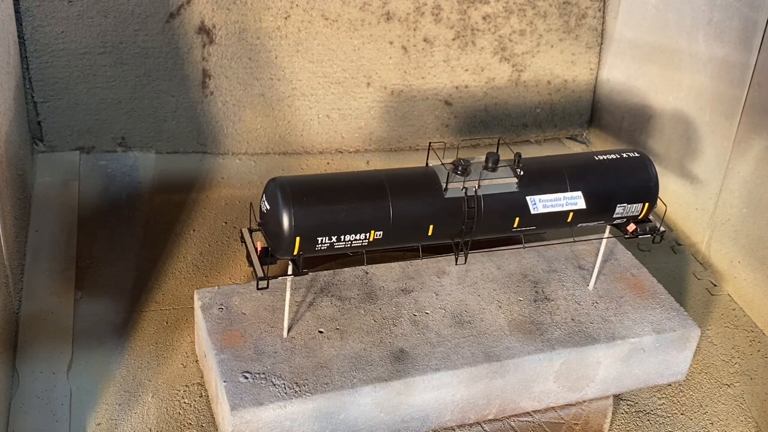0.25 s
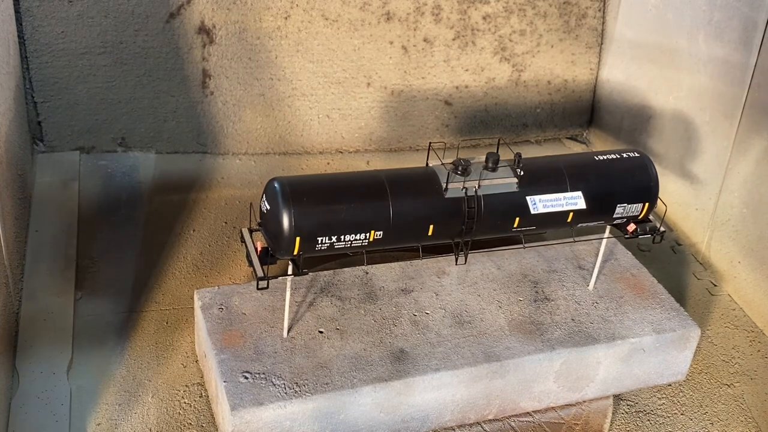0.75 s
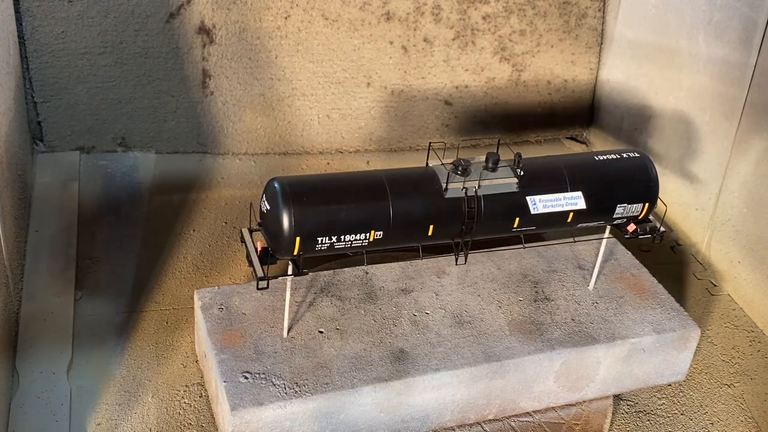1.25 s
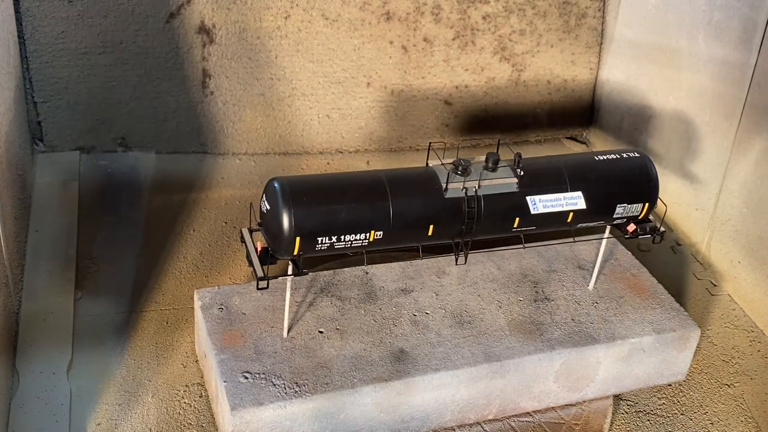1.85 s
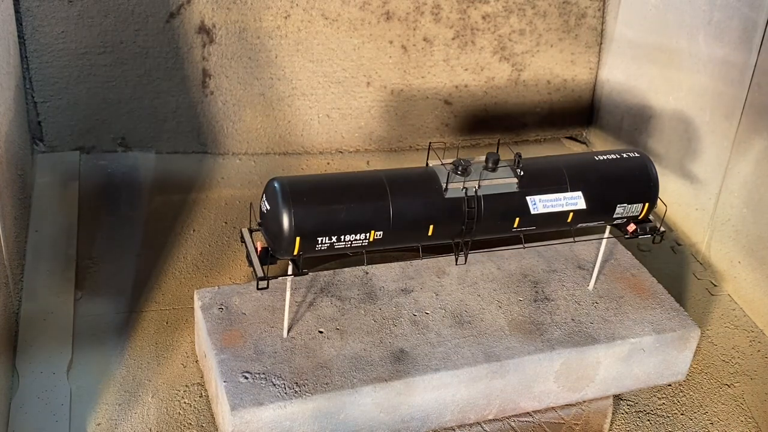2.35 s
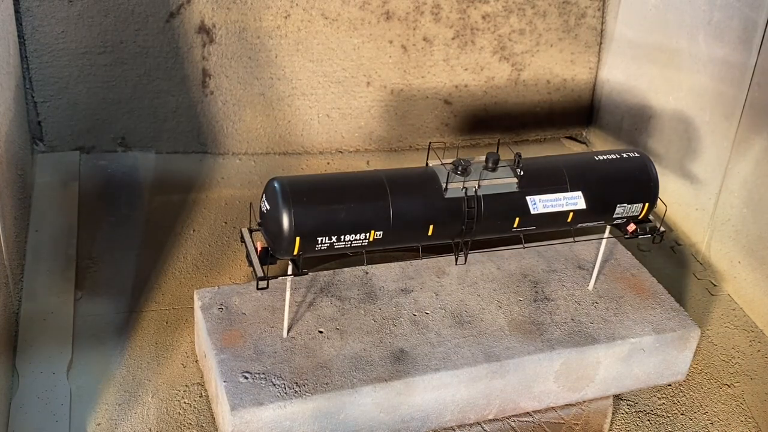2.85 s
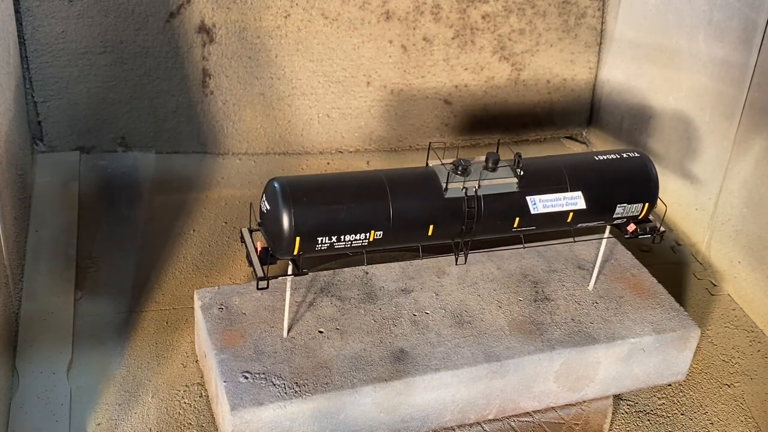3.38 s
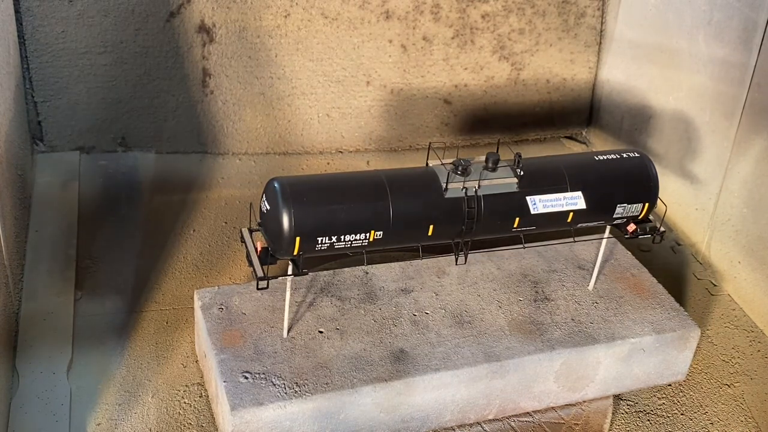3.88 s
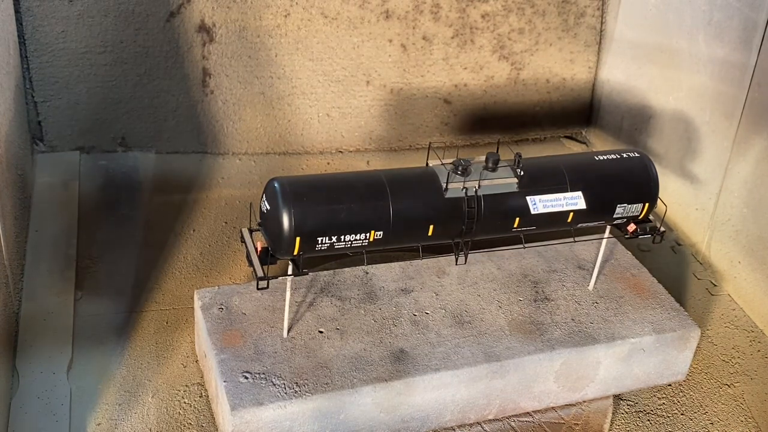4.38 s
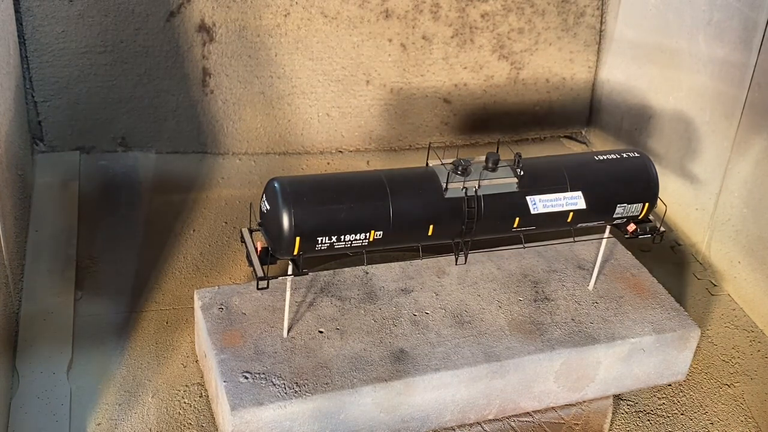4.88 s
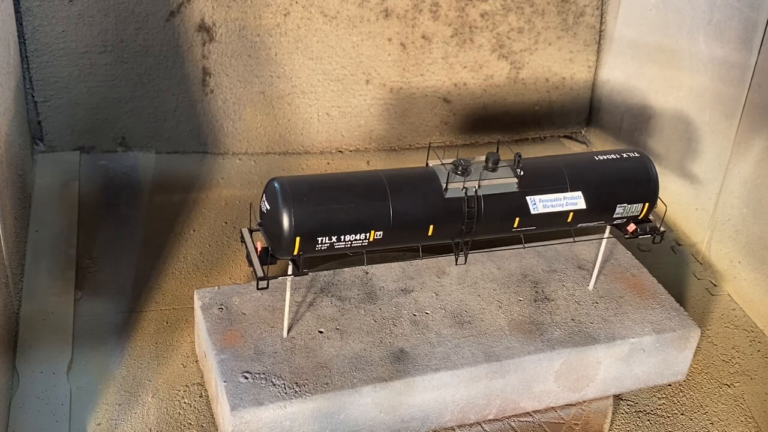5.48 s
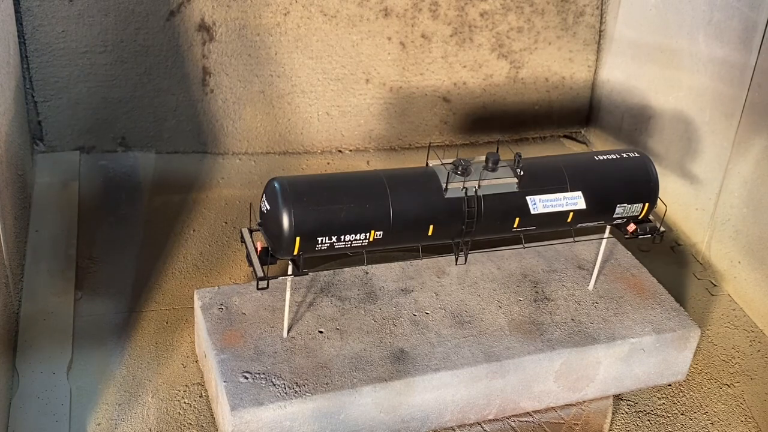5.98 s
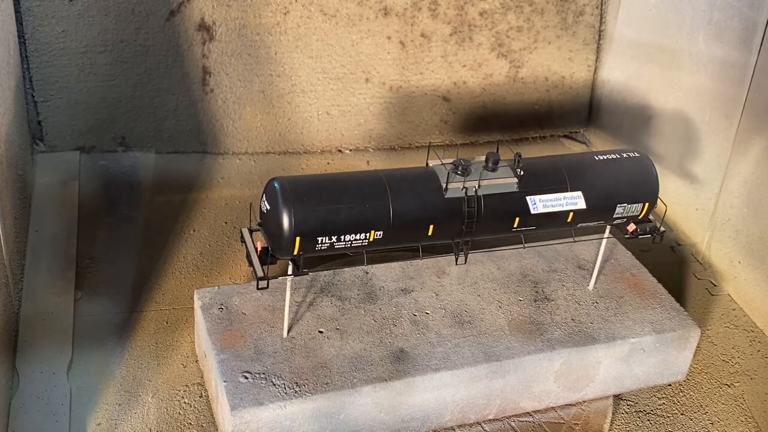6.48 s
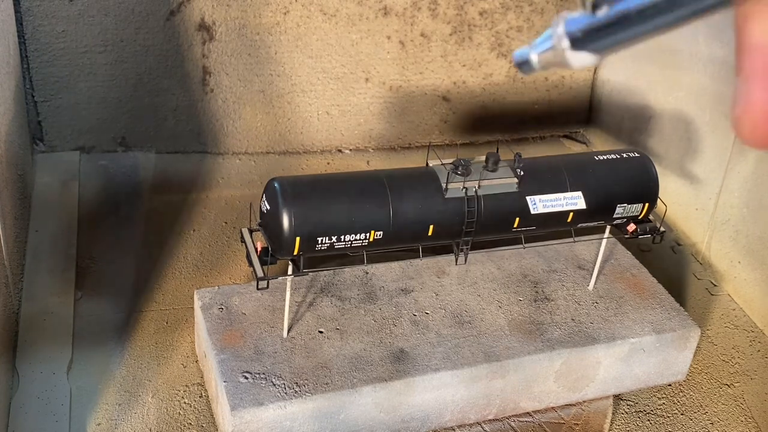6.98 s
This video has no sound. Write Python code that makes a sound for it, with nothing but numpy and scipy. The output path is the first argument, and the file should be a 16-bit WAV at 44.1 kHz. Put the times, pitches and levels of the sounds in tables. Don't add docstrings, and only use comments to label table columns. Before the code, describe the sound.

In a small spray booth, a rocker switch clacks sharply and a fan begins winding up from near silence. A sleeve rustles and small metal parts tick as the airbrush is lifted. Then come eight bright, dry air hisses, two short, four longer, two shorter, cut off cleanly with tiny trigger clicks. The fan's hum and whine keep climbing behind. Close stereo pickup, short room tail.

```python
import sys
import numpy as np
from scipy import signal
from scipy.fft import rfft, irfft, next_fast_len
from scipy.io import wavfile
from scipy.ndimage import uniform_filter1d

SR = 44100
rng = np.random.default_rng(int(sys.argv[2]) if len(sys.argv) > 2 else 0)


def field_ratio(decibels):
    return 10 ** (np.asarray(decibels, dtype=float) / 20)


def dump_mix(stems):
    frames = np.atleast_2d(stems).T
    limited = np.clip(frames, -1, 1)
    pcm = np.round(limited * 32767).astype(np.int16)
    wavfile.write(sys.argv[1], SR, pcm)


N = 318843
TIME = np.arange(N) / SR
SIZE = next_fast_len(N + SR)
HZ = np.maximum(np.fft.rfftfreq(SIZE, 1 / SR), 1)


def at_hz(points, hz=HZ):
    table = np.array(points)
    return np.interp(np.log(hz), np.log(table[:, 0]), table[:, 1])


def rms_one(x):
    return x / np.sqrt(np.mean(x ** 2) + 1e-20)


def shaped(x, gain):
    return irfft(rfft(x, SIZE) * gain, SIZE)[..., :N]


def noise(gain):
    return rms_one(shaped(rng.standard_normal(SIZE), gain))


def drift(hz):
    r = np.exp(-32 * np.pi * hz / SR)
    slow = signal.lfilter([1], [1, -2 * r, r * r], rng.standard_normal(N // 16 + 1002))[1000:]
    return np.interp(np.arange(N) / 16, np.arange(len(slow)), rms_one(slow))


def band(x, low_hz, high_hz):
    return signal.sosfilt(signal.butter(2, [low_hz, high_hz], "band", fs=SR, output="sos"), x)


def ring(click, hz, t60):
    r, w = field_ratio(-60 / (t60 * SR)), 2 * np.pi * hz / SR
    return signal.lfilter([0, np.sin(w)], [1, -2 * r * np.cos(w), r * r], click + 1e-18)


def add(track, s, sound):
    at = round(s * SR)
    track[at:at + len(sound)] += sound[:N - at]


def spin():
    full_blade_hz, from_s, spin_up_s = 649, -.1715, 8.688
    return full_blade_hz * (1 - np.exp(-(TIME - from_s) / spin_up_s))


def fan():
    # (blade rate [Hz], level [dB])
    blade_levels = [(70, -92), (135, -78), (170, -58.5), (215, -47), (280, -41), (330, -52), (352, -43.5),
                    (372, -41.5)]
    # (multiple of the motor rate [1], level [dB])
    whine_tones = [(2, -55.5), (3, -57.5), (4, -56.5), (5, -59), (6, -54.5), (7, -57.5), (8, -60.5)]
    # (frequency [Hz], density [dB per Hz])
    roar_colour = [(18, -43.5), (30, -8), (102, -7), (165, -7.5), (247, 3.5), (309, -12.5), (419, -3.5),
                   (517, -13.5), (637, -6), (772, -14), (1400, -26), (1820, -51), (3080, -120)]
    # (frequency [Hz], width [Hz], boost [dB])
    duct_modes = [(170.8, 13, 15.5), (270, 44, 9.5), (460, 77, 10), (659, 17, 5)]
    # (frequency [Hz], density [dB per Hz])
    rush_colour = [(600, -27.5), (900, -2), (1270, -16.5), (1750, -6.5), (2000, -11), (2600, -9),
                   (3000, -17.5), (4700, -17.5), (5600, -23), (16000, -36.5)]
    motor_per_blade = .569
    blade_hz = spin()
    turn = 2 * np.pi * np.cumsum(blade_hz) / SR

    blade_db = at_hz(blade_levels, blade_hz) + 2.3 * drift(4.1)
    blade = np.sqrt(2) * field_ratio(blade_db) * np.sin(turn + 0.14 * drift(12))

    roar_at_reference_db, reference_hz, roar_power, catches_hz = -40, 300, 2.41, 89
    growth = (blade_hz / reference_hz) ** roar_power / np.hypot(1, (catches_hz / blade_hz) ** 2)
    roar_db = roar_at_reference_db + 20 * np.log10(growth)
    duct = 1 + sum((field_ratio(db) - 1) / np.hypot(1, 2 * (HZ - hz) / width) for hz, width, db in duct_modes)
    roar = field_ratio(roar_db + .5 * drift(22.0)) * noise(field_ratio(at_hz(roar_colour)) * duct)

    whine = sum(field_ratio(db + 1.2 * drift(4.6)) * np.sin(k * motor_per_blade * turn) for k, db in whine_tones)
    whine = whine * field_ratio(.4 * (roar_db + 37.5))
    window = 1 / np.hypot(1, ((HZ - 398) / 32) ** 2)
    whine = field_ratio(7) * shaped(whine, window)

    rush_gain = field_ratio(at_hz(rush_colour)) / np.hypot(1, (HZ / 9500) ** 3)
    rush = field_ratio(-52) * (blade_hz / 360) ** 3.83 * noise(rush_gain)
    return blade + whine + roar + rush


def movement(s, length_s):
    rise_db_per_s, fall_db_per_s = 454, 261
    before_s = np.clip(s - TIME, 0, None)
    after_s = np.clip(TIME - s - length_s, 0, None)
    return field_ratio(-rise_db_per_s * before_s - fall_db_per_s * after_s)


def rustle():
    # (time [s], length [s], bright level [dB], dull level [dB])
    moves = [
        (0, 0.1, -94.5, -74),
        (0.198, 0.2, -90, -70.5),
        (1.047, 0.15, -86.5, -94),
        (1.302, 0.2, -72.5, -66),
        (1.584, 0.049, -68, -73),
        (1.75, 0.016, -103, -76),
        (1.858, 0.014, -94, -79),
        (2.025, .03, -93, -81.5),
        (2.147, 3.6, -114, -91.5),
    ]
    still = field_ratio(np.array([[-97], [-92.5]]))
    gains = np.array([movement(s, length_s) for s, length_s, _, _ in moves])
    bright_gain, dull_gain = field_ratio(np.array(moves)[:, 2:]).T @ gains + still
    bright = noise(1 / np.hypot(1, (3000 / HZ) ** 2) / np.hypot(1, HZ / 9000))
    dull_slopes = 1 / np.hypot(1, (500 / HZ) ** 2) / np.hypot(1, (HZ / 2950) ** 12)
    dull_peak = 1 + 1.2 / (1 + ((HZ - 2800) / 130) ** 2)
    dull = noise(dull_slopes * dull_peak)
    grain = field_ratio(drift(150))
    return grain * (field_ratio(2) * bright_gain * bright + dull_gain * dull)


def ticks():
    # (time [s], peak level [dB], low edge [Hz], high edge [Hz])
    contacts = [(.181, -64, 4000, 15000), (0.201, -55, 2010, 6000), (.255, -63, 2000, 8900),
                (0.539, -66, 3450, 4800), (1.0705, -40.5, 8800, 17050), (1.069, -46, 3500, 6950),
                (1.179, -57.5, 4540, 15800), (1.312, -27.5, 4940, 16900), (1.362, -43, 5000, 7300),
                (1.366, -53, 9000, 16000), (1.4232, -42, 10030, 16000), (1.503, -47, 5570, 17000),
                (1.753, -65, 1200, 3520), (1.777, -58, 1216, 3500), (1.8378, -61, 1192, 3020),
                (1.868, -58, 1186, 2940), (2.01, -60, 1210, 2970), (3.636, -43.5, 2000, 7400),
                (4.469, -25, 10600, 17000), (4.47, -35.5, 2500, 8000), (5.316, -27, 11000, 16760),
                (5.3164, -35.5, 2170, 4500), (5.334, -34, 6000, 16500), (6.216, -38.5, 3000, 16500),
                (7.0814, -44, 7000, 14000)]
    # (frequency [Hz], level [dB])
    metal_modes = [(2600, -2), (4400, -6.5), (6300, -14), (7700, -12.5), (10500, -15), (12000, -3.5),
                   (13800, 2.5), (15500, 1)]
    out = np.zeros(N)
    for s, db, low_hz, high_hz in contacts:
        crack = rng.standard_normal(2000) * np.exp(-np.arange(2000) / (0.0011 * SR))
        modes = sum(field_ratio(level_db + rng.normal(0, 4)) * ring(crack, hz, .005) for hz, level_db in metal_modes)
        tick = band(.15 * modes + crack, low_hz, min(high_hz, 16200))
        add(out, s, field_ratio(db) * tick / np.abs(tick).max())
    return out


def knocks():
    # (time [s], level [dB], low edge [Hz], high edge [Hz], length [s])
    hits = [(0.185, -40.5, 258, 454, 0.029), (0.294, -20.5, 4000, 13100, 0.0015),
            (0.2952, -12.5, 1740, 2600, .002), (0.2978, -16.5, 2530, 5160, 0.0035),
            (0.3001, -14.5, 248, 933, 0.005), (0.3165, -25, 198, 810, .002),
            (0.865, -51.5, 900, 4830, 0.029), (1.400, -33.5, 1000, 2700, .008),
            (1.419, -39.5, 1500, 2800, 0.011), (1.411, -36, 625, 1380, 0.038),
            (1.501, -42, 700, 2610, 0.016)]
    # (frequency [Hz], level [dB], t60 [s])
    plate_modes = [(264, -1.5, 0.056), (341, 11.5, .05), (576, 2.5, 0.11), (735, -7, 0.032),
                   (2080, -8.5, .015), (4340, -15, 0.007)]
    # (time [s], level [dB], frequency [Hz])
    bumps = [
        (0.639, -47, 110),
        (1.211, -52, 108),
        (1.401, -43, 250),
        (2.361, -41, 341),
        (2.797, -32, 196),
        (3.801, -31, 80),
        (5.501, -33, 70),
        (7.05, -39, 50),
    ]
    out, to_walls, t = np.zeros(N), np.zeros(N), TIME[:SR // 4]
    for s, db, low_hz, high_hz, length_s in hits:
        rattle = band(rng.standard_normal(len(t)) * np.exp(-t / length_s), low_hz, high_hz)
        modes = sum(field_ratio(level_db) * ring(rattle, hz, t60) for hz, level_db, t60 in plate_modes)
        sound = field_ratio(db) * (.3 * modes / np.abs(modes).max() + rattle / np.abs(rattle).max())
        add(out, s, sound)
        spread = band(np.eye(1, len(t))[0], low_hz, high_hz)
        add(to_walls, s + length_s, spread * np.linalg.norm(sound) / np.linalg.norm(spread))
    for s, db, hz in bumps:
        add(out, s, field_ratio(db) * ring(np.eye(1, SR // 5)[0], hz, 4.2 / hz))
    return out, to_walls


def wall_echo(jet, sweep):
    notch_hz, sag_hz, width_hz, share = 3797, 470, 150, 0.81
    centre_hz = notch_hz - sag_hz * np.sin(np.pi * sweep) + 60 * drift(24)
    turn = np.exp(2j * np.pi * np.cumsum(centre_hz) / SR)
    r = np.exp(-2 * np.pi * width_hz / SR)
    cancelled = np.real(signal.lfilter([1 - r], [1, -r], jet / turn) * turn)
    return jet - 2 * share * cancelled


def airbrush(open_s=0.0056, shut_s=0.0049, flutter_db=0.5):
    # (air on [s], air off [s])
    pulls = [
        (2.169, 2.314),
        (2.543, 2.763),
        (2.985, 3.554),
        (3.789, 4.428),
        (4.668, 5.268),
        (5.499, 6.097),
        (6.401, 6.767),
        (7.114, 7.3),
    ]
    # (level at start [dB], level at end [dB], low body [dB])
    jet_levels = [(-40.5, -41, -1), (-39.5, -40, -0.5), (-38, -38, 0.5), (-39, -40, 0), (-40.5, -39, 0),
                  (-39, -40.5, 1), (-39, -36.5, 2.5), (-35.5, -36.5, 2)]
    # (frequency [Hz], density [dB per Hz])
    jet_colour = [(300, -28.5), (900, -23.5), (1500, -19), (2050, -12), (2500, -12), (2900, -9.5),
                  (3500, -10), (4200, -9), (4800, -6.5), (6000, -6.5), (7600, -1.5), (9300, -3),
                  (12000, -0.5), (15500, 5.5), (17000, -16.5)]
    (on_s, off_s), rows = np.transpose(pulls), np.array(jet_levels)
    pull = np.clip(np.searchsorted(on_s, TIME) - 1, 0, None)
    held_s = np.clip(TIME - on_s[pull], 0, None)
    released_s = np.clip(TIME - off_s[pull], 0, None)
    valve = (1 - np.exp(-held_s / open_s)) * np.exp(-released_s / shut_s)

    progress = np.clip(held_s / (off_s - on_s)[pull], 0, 1)
    level_db = rows[pull, 0] + (rows[pull, 1] - rows[pull, 0]) * progress
    top_db = -1 + np.exp(-held_s / .12)
    body_db = rows[pull, 2] + 1.45 * drift(5.5)

    hand_sweep = np.clip(held_s / .62, 0, 1)
    jet = wall_echo(noise(field_ratio(at_hz(jet_colour))), hand_sweep)
    jet = jet / np.std(band(jet, 3000, 7000))
    top, body = band(jet, 9000, 22000), band(jet, 340, 3100)
    jet = jet + (field_ratio(top_db) - 1) * top + (field_ratio(body_db) - 1) * body

    spit = signal.lfilter([1], [1, -.93], rng.random(N) < 40 / SR)
    flutter = flutter_db * drift(37) + 0.44 * drift(300)
    jet = (1 + .8 * spit) * field_ratio(level_db + flutter) * jet
    return valve * shaped(jet, HZ < 15850)


def room_floor():
    # (frequency [Hz], density [dB per Hz])
    floor_colour = [(15, -56.5), (25, -5.5), (86, -5.5), (106, -12), (139, -11), (219, -22), (392, -19.5),
                    (605, -43.5), (957, -34), (1220, -48.5), (8000, -55), (10400, -86), (17600, -120)]
    return field_ratio(-58.5) * noise(field_ratio(at_hz(floor_colour)) / np.hypot(1, (HZ / 9000) ** 2))


def shop(x, delay_s):
    # (frequency [Hz], t60 [s])
    shop_t60 = [(150, .24), (1000, 0.35), (4000, 0.32), (12000, .22)]
    t, tail = TIME[:SR // 2], 0
    for hz in 45 * 2. ** np.arange(9):
        t60 = at_hz(shop_t60, hz * 1.4)
        octave = band(rng.standard_normal(len(t)), hz, min(2 * hz, 20000))
        tail = tail + octave * field_ratio(-60 * t / t60) / np.sqrt(t60)
    tail = tail * np.clip(t / max(delay_s, 1e-4), 0, 1)
    return signal.fftconvolve(x, tail / np.linalg.norm(tail))[:N]


def scene():
    # (frequency [Hz], level [dB])
    side_width = [(40, -25), (110, -17), (200, -28.5), (380, -13), (700, -9), (1290, -5.5), (1900, -14),
                  (2400, -24.5), (6000, -25), (7500, -35)]
    background = fan() + rustle() + room_floor()
    brush = ticks() + airbrush()
    blows, to_walls = knocks()
    tails = field_ratio(-14) * shop(brush, delay_s=.003) + field_ratio(-7.5) * shop(to_walls, delay_s=0.006)
    mid = brush + blows + shaped(tails + background, np.clip((15900 - HZ) / 150, 0, 1) ** 2)
    side = shaped(shop(mid, delay_s=0.0013), field_ratio(at_hz(side_width)))
    return np.array([mid + side, mid - side])


def drop_weaker(ports, mid_db, side_db, waver_db, jump_db=4):
    mid_side = [ports[0] + ports[1], ports[0] - ports[1]]
    lines = signal.stft(mid_side, nperseg=1024, window="hann")[2]
    power = (np.abs(lines[:, :512]) ** 2).reshape(2, 64, 8, -1).sum(axis=2)
    power = uniform_filter1d(power, size=5)
    waver = np.repeat(rng.standard_normal(power.shape), 2, axis=2)[..., :power.shape[2]]
    limit_db = np.reshape([mid_db, side_db], (2, 1, 1)) + waver_db * waver
    keep = power > power[::-1] * field_ratio(2 * limit_db)
    keep[:, :6] = True
    treble = power[:, 8:].sum(axis=(0, 1))
    keep[..., 2:] |= treble[2:] > field_ratio(2 * jump_db) * treble[:-2]
    lines[:, :512] *= np.repeat(keep, 8, axis=1)
    mid, side = signal.istft(lines, nperseg=1024, window="hann")[1][:, :N] / 2
    return np.array([mid + side, mid - side])


def top_cut(x):
    return signal.sosfilt(signal.butter(12, 17110, fs=SR, output="sos"), x)


def record(dry):
    # (frequency [Hz], level [dB])
    left_lean = [(100, 1), (250, -1), (430, -2.5), (700, 4), (950, 2.5), (1400, 0.5)]
    turn_from_hz, turn_every_hz = 6760, 4430
    turn = np.pi * np.clip(HZ - turn_from_hz, 0, None) / turn_every_hz
    lean = field_ratio(at_hz(left_lean) / 2) * np.exp(-1j * turn)
    low_cut = np.hypot(1, (45 / HZ) ** 4)
    ports = shaped(dry, np.array([lean, 1 / lean]) / low_cut)
    mix = drop_weaker(ports, mid_db=-8.0, side_db=-3.0, waver_db=1.0)
    return top_cut(mix)


dry = scene()
out = record(dry)
dump_mix(out)
```